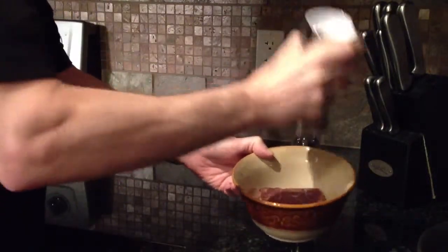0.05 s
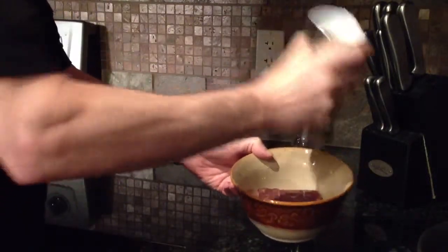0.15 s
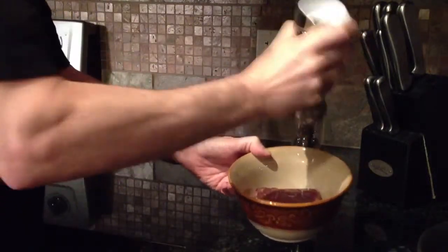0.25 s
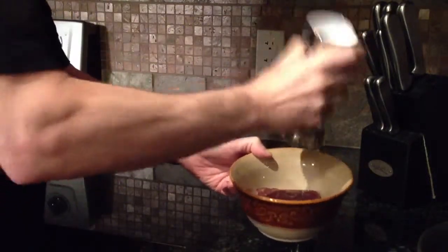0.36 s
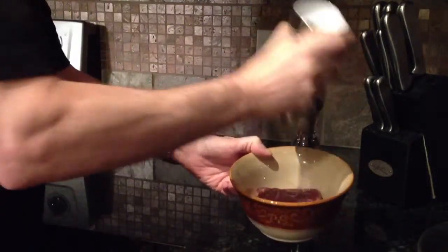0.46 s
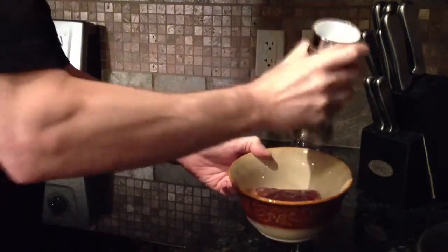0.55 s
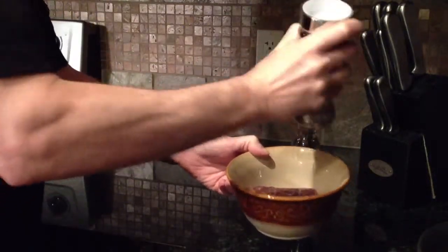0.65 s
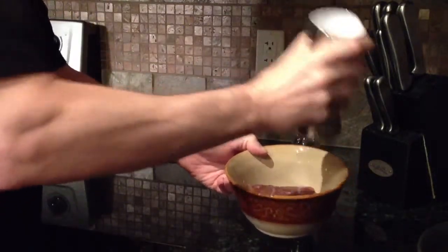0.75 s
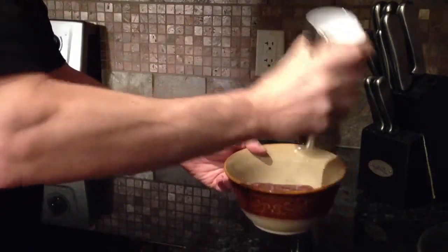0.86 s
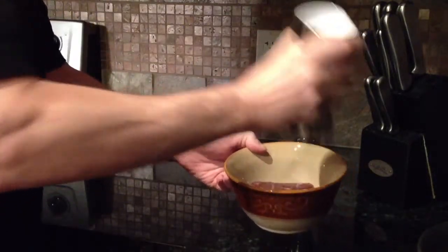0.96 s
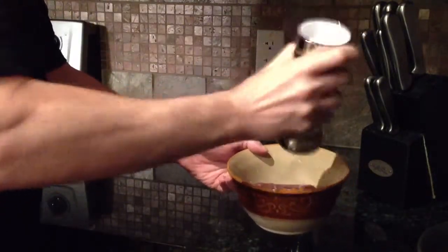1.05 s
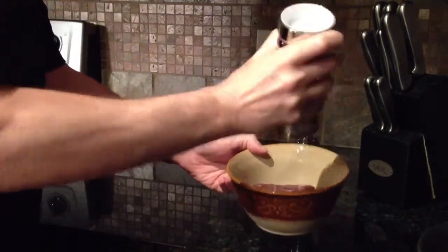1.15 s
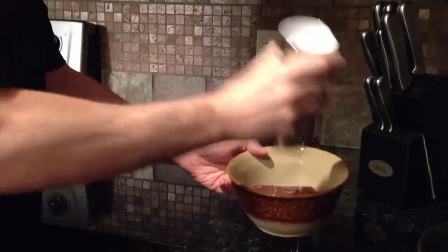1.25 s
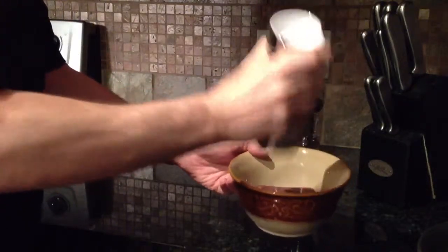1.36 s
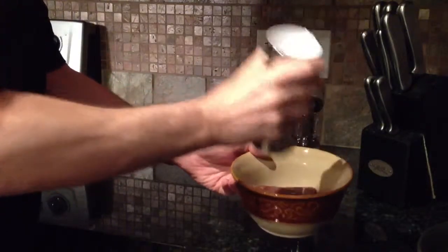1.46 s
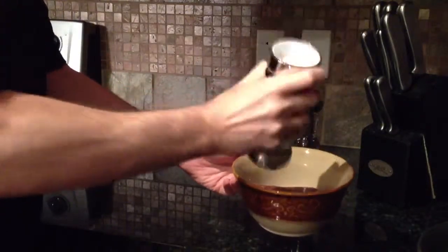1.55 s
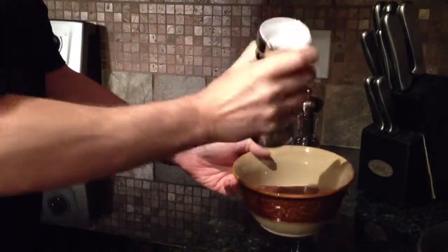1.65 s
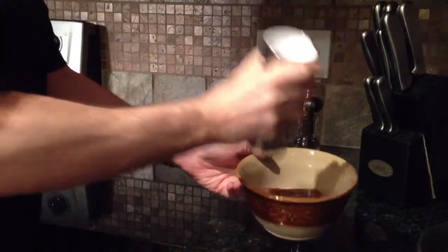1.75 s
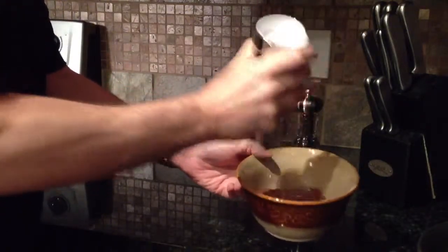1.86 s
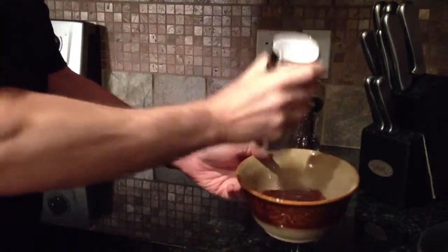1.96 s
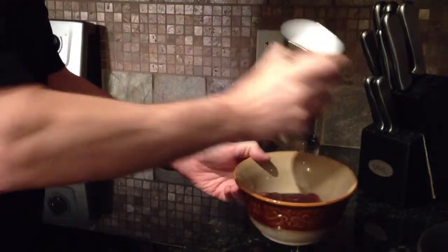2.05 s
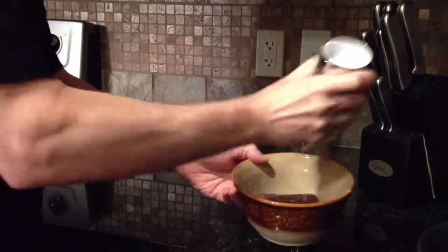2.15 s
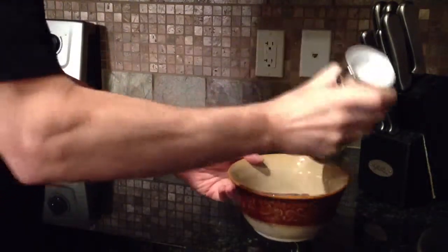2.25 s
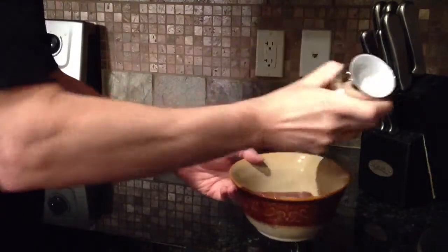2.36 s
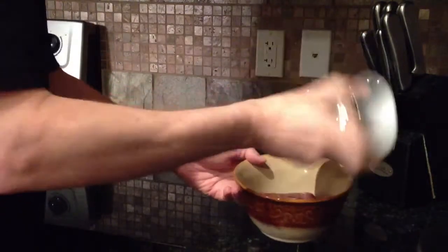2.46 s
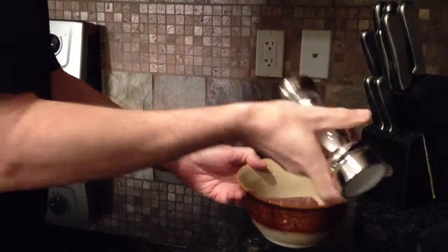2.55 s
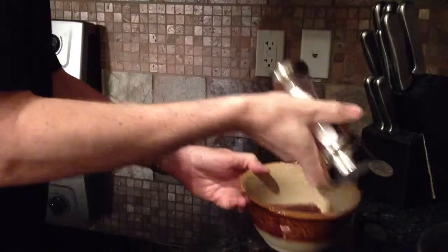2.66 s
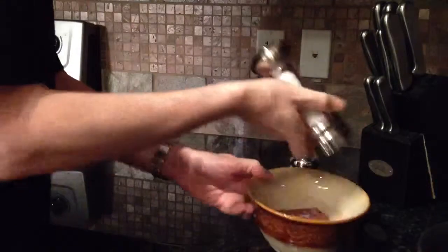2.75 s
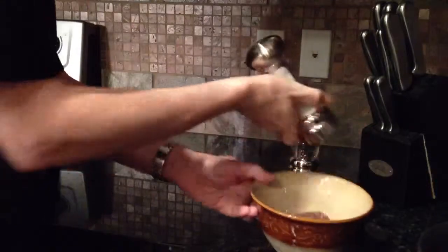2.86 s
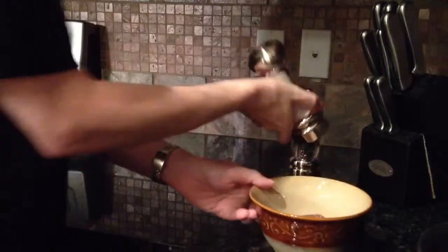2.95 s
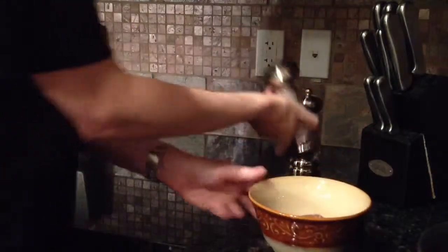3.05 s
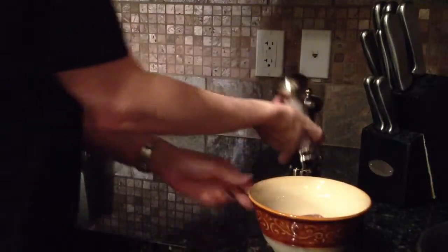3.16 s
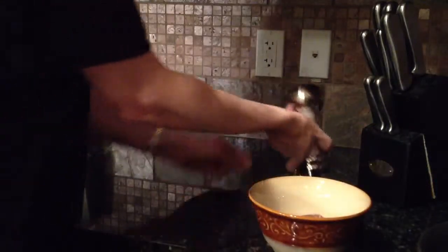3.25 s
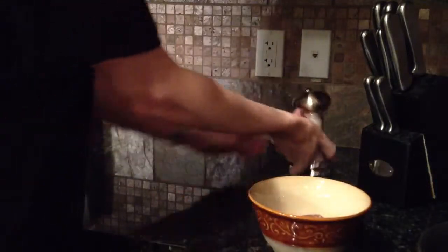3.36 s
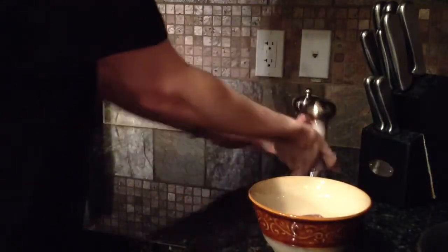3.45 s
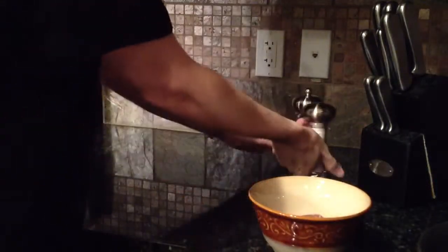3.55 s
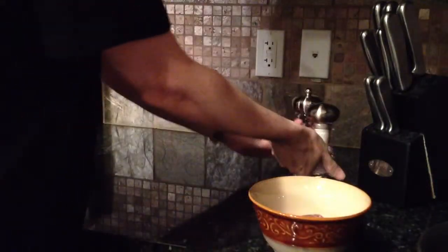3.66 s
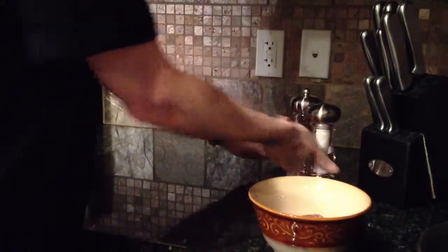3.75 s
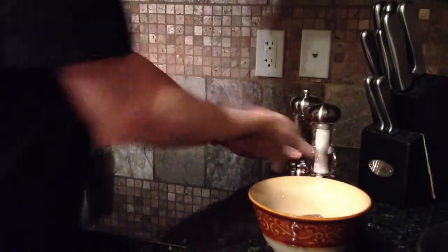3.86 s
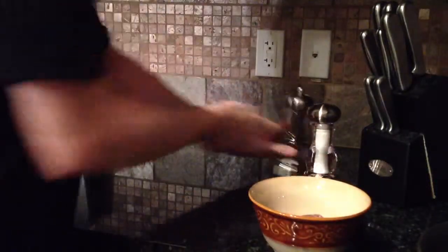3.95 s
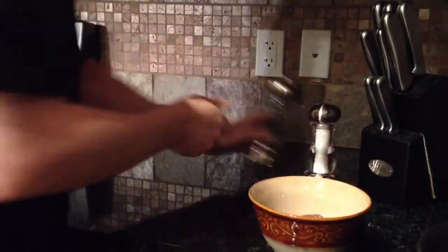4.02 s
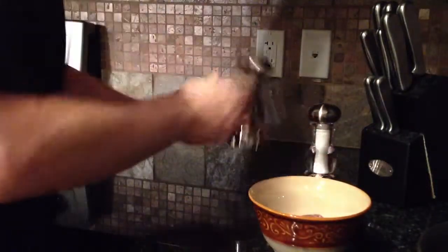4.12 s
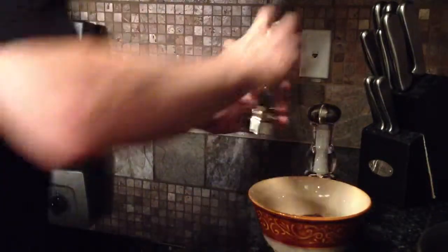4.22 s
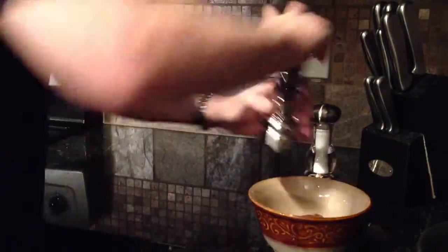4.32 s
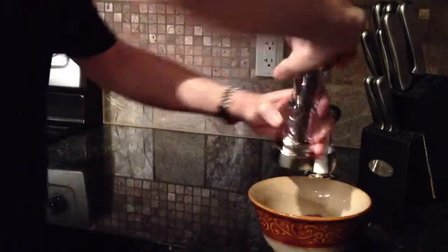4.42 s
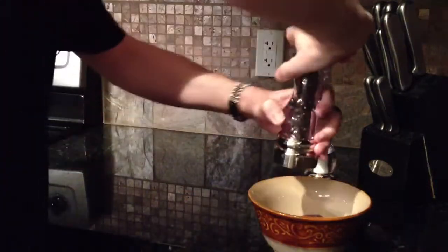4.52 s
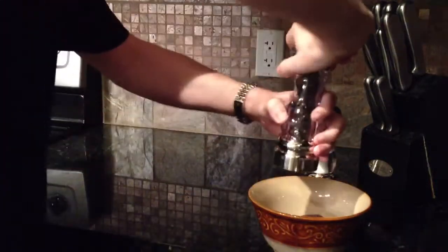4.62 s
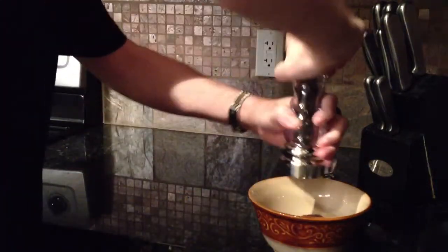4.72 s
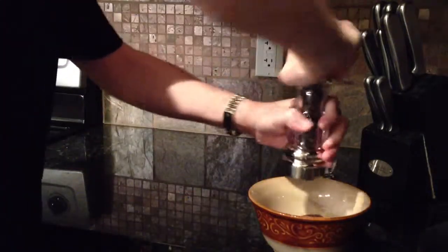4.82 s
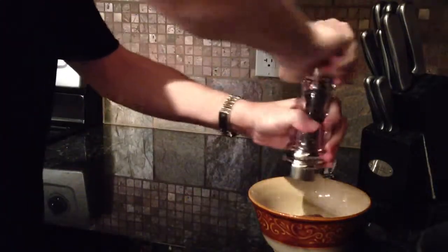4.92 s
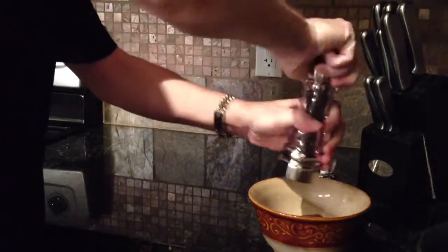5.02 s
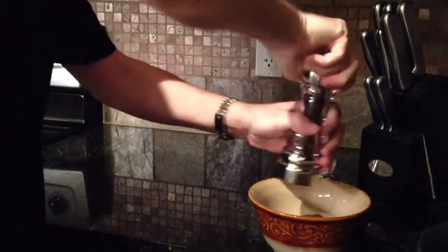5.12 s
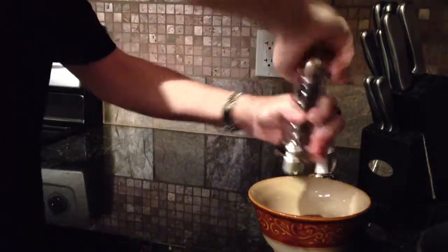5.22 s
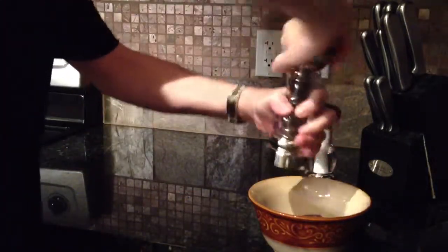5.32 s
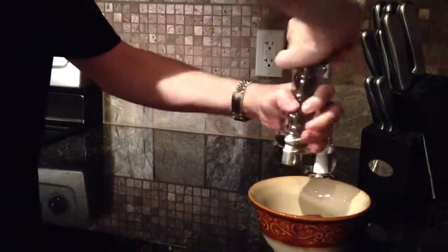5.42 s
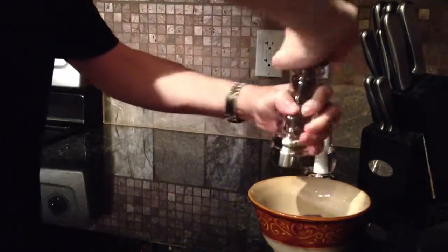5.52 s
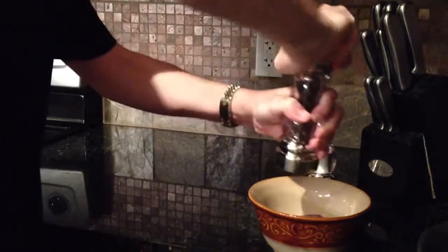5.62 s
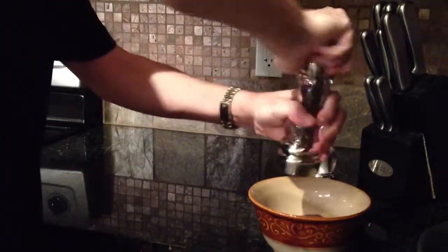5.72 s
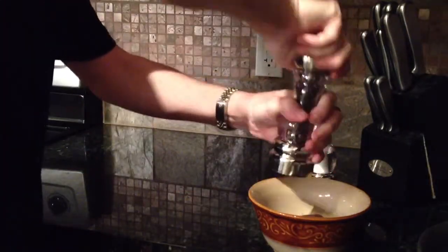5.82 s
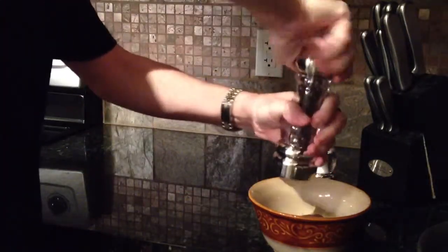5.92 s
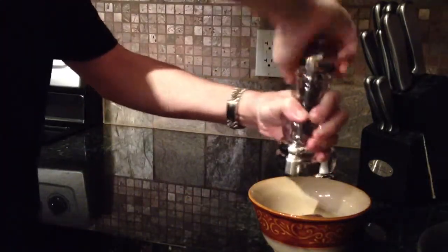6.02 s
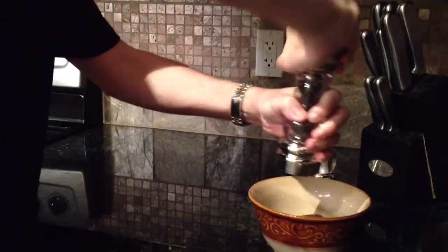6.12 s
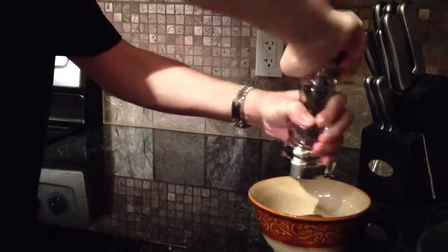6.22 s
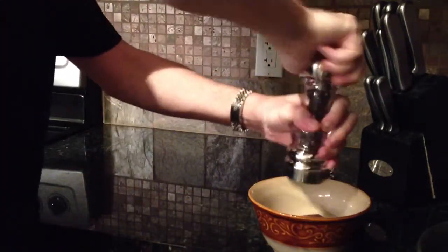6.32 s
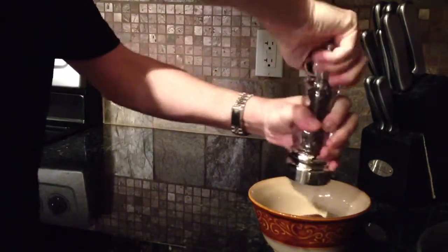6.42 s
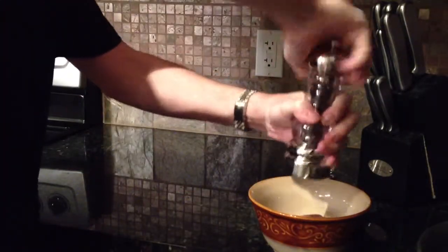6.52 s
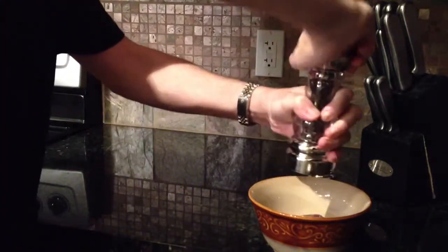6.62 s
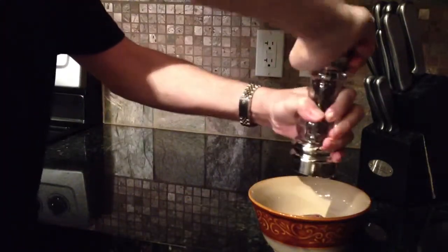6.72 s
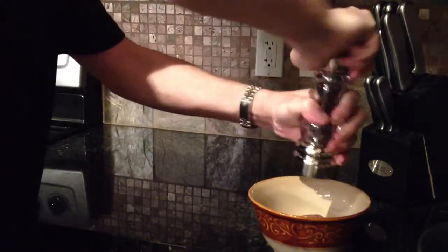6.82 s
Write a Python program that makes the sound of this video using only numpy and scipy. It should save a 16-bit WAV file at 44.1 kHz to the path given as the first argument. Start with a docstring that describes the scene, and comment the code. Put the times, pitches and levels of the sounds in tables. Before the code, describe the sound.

Salt shaken in soft quick strokes, a ceramic bowl knocks down on stone, a mill thuds, then pepper crunches in short twisting bouts in a kitchen.

```python
"""A pepper mill twisted in four bouts on a tiled kitchen counter, a small microphone about a metre away: corns crunch
between the burrs as dense grains that excite the mill's modes, and some crack as noisy bursts.
Before it, salt is shaken from a mill in short soft strokes of filtered crystal clicks, a ceramic bowl is set on
the stone and rocks, and the mill is put down hard: each contact is a push plus chatter, ringing the object.
Appliances murmur behind as coloured noise, with a drone and a faint whistle; hard walls echo the nearby work."""
import sys
import numpy as np
from scipy import signal
from scipy.fft import rfft, irfft
from scipy.io import wavfile
from scipy.ndimage import uniform_filter1d

SR = 44100
rng = np.random.default_rng(int(sys.argv[2]) if len(sys.argv) > 2 else 0)


def volts(x):
    """Linear amplitude factor 10**(x/20) for a level x in dB, scalar or array-like."""
    e = np.asarray(x, float) / 20
    return 10 ** e


def store_wav(level_fs):
    """Save 16-bit WAV to argv[1]."""
    pcm = np.round(np.clip(np.atleast_2d(level_fs), -1, 1) * 32767)
    wavfile.write(sys.argv[1], SR, pcm.T.astype(np.int16))


N = 303408
TIME = np.arange(N) / SR

# pushes of the wrist: (time [s], length [s], relative crunch level at start [dB], at end [dB])
TWISTS = [(4.72, 0.14, -72, -46.5), (4.94, 0.17, -45.5, -63), (5.61, 0.085, -63.5, -45),
          (5.745, 0.02, -45, -44.5), (6.208, .024, -64, -64), (6.238, 0.088, -49, -42),
          (6.733, 0.083, -56, -48.5), (6.85, 0.046, -36.5, -47)]
# corns bursting: (time [s], relative level [dB], brightness [dB])
CRACKS = [(4.778, -54, -6), (4.8435, -46, -12), (4.8747, -48.5, 15.5), (4.9205, -30, 7.5),
          (4.9246, -33.5, 8), (5.0068, -43.5, 10), (5.565, -25.5, 2), (5.6743, -45.5, -12),
          (5.7574, -49.5, 2), (5.775, -48.5, 4), (6.2329, -33, -16.5), (6.324, -39, -16), (6.343, -48, 7),
          (6.735, -37.5, -13), (6.843, -32.5, -15), (6.8698, -40.5, -21)]
# broad colour of crunch and cracks: (frequency [Hz], relative level [dB])
CRUNCH = [(400, -23), (694, -8.5), (1690, 0.5), (2630, 6.5), (3110, 1), (4800, -0.5), (5350, -6.5),
          (6800, -3), (7670, -7.5), (9790, -18), (12500, -15.5), (15500, -34.5)]
# modes of the pepper mill: (frequency [Hz], relative level [dB], t60 [s])
PEPPER_MILL = [(1468, 3, 0.04), (1724, 6, 0.045), (1965, 6, 0.04), (2220, 9, 0.045), (2470, 6, .045),
               (2680, 7, 0.04), (4740, 0, 0.026)]
CRUNCH_PER_S, CRUNCH_SPREAD_DB, CRUNCH_SMEAR_S = 2400, 2.9, 0.0012
CRACK_MS, SLOWER_WHEN_DULL = 3.86, 0.39  # length at brightness 0 dB; dB longer per dB duller
DEBRIS_DB, DEBRIS_S = -33, 0.0091  # fragments ground right after a burst: relative level, decay
POP_HZ, POP_DB, POP_MS = 2437, -13.5, 2  # hollow pop of a corn that yields slowly
GRIP_SHIFT_DB, GRIP_SHIFT_S = 6, 0.05  # the moving hand frees and damps each mode of the mill

# salt strokes: (time of the front's peak [s], relative level [dB], lag of the rear of the pile [ms])
SHAKE = [(0.017, -54, 16), (0.173, -55, 41), (0.35, -53.5, 48), (0.527, -55, 58), (0.72, -61, 44),
         (0.882, -57.5, 26), (1.04, -55, 44), (1.22, -56.5, 30), (1.39, -55.5, 36), (1.565, -59, 21),
         (1.74, -57.5, 19), (1.89, -56, 46), (2.268, -61.5, 21), (2.531, -60.5, 59)]
# colour of the crystal hiss: (frequency [Hz], relative level [dB])
SALT = [(1890, -15.5), (2180, -1), (2450, -12), (6120, -11.5), (7140, -8.5), (10200, -15.5), (15000, -15)]
# wall modes of the salt mill: (frequency [Hz], relative level [dB], t60 [s])
SALT_MILL = [(2175, -4.5, 0.0075), (5430, -10, 0.0251), (7540, 4.5, 0.0067)]
# lumps of salt rattling on the cap: (time [s], relative level [dB])
LUMPS = [(.175, -35), (1.89, -43), (2.27, -43), (2.54, -43.5)]
LUMP_S = 0.02  # half width of each rattle
SLUMP_RISE_MS, REAR_DB = 30, -1.5  # swell of each slump; rear of the pile against the front
FRONT_FAVOURS, REAR_FAVOURS = [-6, 1.9, -4.5], [1.5, -6.5, 1.8]  # relative level per wall mode [dB]

# bowl touching the counter: (time [s], relative level [dB], contact [ms], chatter [dB])
BOWL_HITS = [(2.73, 1, 0.35, 17.5), (2.7334, -1.5, 0.23, -8.5), (2.7359, 1, 0.33, -4),
             (2.8204, -6, 0.18, 1), (2.8244, -2.5, 0.29, 4), (2.926, -22, 0.5, -2.5),
             (3.031, -14.5, 0.76, 6), (3.0371, -19.5, .45, 3)]
# broad colour of the bowl's thud: (frequency [Hz], relative level [dB])
BOWL_THUD = [(47, -47), (80, -24.5), (200, -32), (610, -11), (880, -6.5), (1390, -7.5), (1580, -14),
             (2480, -15), (2890, -26), (4650, -34), (5410, -41), (8160, -38), (14000, -66.5)]
# modes of the bowl: (frequency [Hz], relative level [dB], t60 [s])
BOWL = [(266, -5, 0.12), (433.4, -2.5, 0.13), (764, -8, 0.087), (1048, -3, 0.1), (1346, -2.5, 0.082),
        (1774, -5, 0.13), (7880, -13, 0.036), (11300, -15, 0.045)]
# the rim sings after a contact, for longer the less the hand and counter hold it:
# (time [s], relative level [dB], t60 [s])
RIM_RINGS = [(2.732, 15, 0.16), (2.8203, 6.5, 0.12), (3.038, -16.5, 0.38)]
RIM_HZ = 2466
# air pocket under the foot of the bowl: its note climbs as the foot rebounds
POCKET_LOW_HZ, POCKET_HIGH_HZ, POCKET_CLIMB_S, POCKET_T60_S = 1026.6, 1181, 0.017, 0.13
POCKET_SAG_HZ_PER_MS = 430  # the start is this much lower per ms of contact

# mill touching the counter: (time [s], relative level [dB], contact [ms], chatter [dB])
MILL_HITS = [(3.4945, -19.5, 0.5, 19.5), (3.4975, -8, 0.614, 12), (3.5095, -7.5, 0.76, 2.5)]
# broad colour of the mill's thud: (frequency [Hz], relative level [dB])
MILL_THUD = [(47, -53), (150, -11), (471, -3.5), (833, -12), (1320, -9), (2440, -14.5), (4400, -12),
             (6110, -18.5), (9890, -35.5), (15000, -42.5)]
# modes of the mill set down: (frequency [Hz], relative level [dB], t60 [s])
MILL = [(226, 1, 0.4), (295, 2, .3), (427, 8, 0.3), (511, 13, 0.12), (603, 3, 0.2), (1230, 2, 0.1)]
BOWL_CHATTER, MILL_CHATTER = 8.73, 4  # chatter time as a multiple of the contact
BOWL_SOFT, MILL_SOFT = 0.2, 0.015  # the chatter is blunted by this share of the contact time
TICK_DB = -22.5  # the hard edge of each contact

# hands sliding on the mills, corns shifting inside:
# (time [s], length [s], relative level at start [dB], at end [dB])
HANDLE = [(3.413, 0.0032, -75, -78.5), (3.96, 0.11, -78.5, -65.5), (4.11, 0.156, -77.5, -74.5),
          (4.322, 0.17, -64, -70)]
# colour of that rustle: (frequency [Hz], relative level [dB])
RUSTLE = [(1060, -29), (1800, -6), (5990, -1.5), (6690, 5.5), (7680, 3), (8960, -13), (14000, -14.5)]
GRIP_DB_PER_S, LET_GO_DB_PER_S = 902, 464  # how fast an effort starts and dies

# decay of the tiled room: (frequency [Hz], t60 [s])
ROOM = [(150, 0.83), (400, 0.67), (1000, 0.67), (2500, 0.45), (6000, 0.68), (12000, 0.39)]

# colour of the appliance hiss: (frequency [Hz], relative level [dB])
KITCHEN = [(60, -38.5), (112, -5.5), (291, -9), (433, -9.5), (889, -19.5), (1050, -13.5), (1450, -21),
           (3420, -22.5), (13500, -29.5), (15500, -26.5)]
# blurred tones of the appliances: (frequency [Hz], relative level [dB], t60 [s])
MURMUR = [(109.4, -1.5, 0.99), (246, -7, 0.31), (352.3, -8, 0.21), (436, -5.5, 0.25), (606, -8.5, 0.082),
          (1015.5, -10.5, 0.017)]
KITCHEN_DB = -65.5  # rms of hiss and murmur together
# a low drone that swells and fades: (time of peak [s], half width [s], relative level [dB])
DRONE = [(1.25, 0.37, -70)]
DRONE_HZ, DRONE_REST_DB = 166, -70.5
# a faint whistle that comes and goes: (time [s], length [s], pitch [Hz], relative level [dB])
WHISTLE = [(3.333, 0.079, 1254, -74), (4.394, 0.34, 1230, -76), (5.116, 0.38, 1311, -78)]
WHISTLE_WOBBLE_HZ, WHISTLE_FLUTTER_DB = 25.2, 3  # per unit of waver and flutter

# treble response of the microphone: (frequency [Hz], gain [dB])
MICROPHONE = [(8200, 1.5), (10000, -4), (12000, 2)]
BASS_CUT_HZ = 116.5


def level(x, db):
    """Scale to an rms level."""
    return x * volts(db) / np.sqrt(np.mean(x ** 2))


def colour(x, points, size=4096):
    """Causal minimum-phase filter whose gain follows (Hz, dB) points."""
    hz, db = np.transpose(points)
    grid = np.arange(size // 2 + 1) * SR / size + 1
    log_gain = np.interp(np.log(grid), np.log(hz), db, left=db[0]) * np.log(10) / 20
    cepstrum = irfft(log_gain)
    # fold the cepstrum so that nothing sounds before its cause
    cepstrum[1:size // 2] *= 2
    cepstrum[size // 2 + 1:] = 0
    impulse = irfft(np.exp(rfft(cepstrum)))
    return signal.fftconvolve(x, impulse)[:len(x)]


def ring(x, modes):
    """The object's exponentially decaying modes, excited by x."""
    t = TIME[:SR // 2]
    impulse = sum(volts(db) * np.sin(2 * np.pi * hz * t) * 1000. ** (-t / t60) for hz, db, t60 in modes)
    return signal.fftconvolve(x, impulse)[:N]


def gate(rows):
    """Gain of efforts that set in quickly, run from a start to an end level and die away."""
    s, length, start_db, end_db = np.transpose(rows)[:, :, None]
    hold = start_db + (end_db - start_db) * np.clip((TIME - s) / length, 0, 1)
    onset = GRIP_DB_PER_S * np.clip(s - TIME, 0, None)
    release = LET_GO_DB_PER_S * np.clip(TIME - s - length, 0, None)
    return volts(hold - onset - release).sum(axis=0)


def grains(rate, spread_db, smear_s):
    """Random clicks, a few larger than the rest, each with a short gritty tail; rms 1."""
    when = rng.random(N) < rate / SR
    sizes = when * volts(spread_db * rng.exponential(size=N))
    tails = signal.lfilter([1], [1, -np.exp(-1 / (smear_s * SR))], sizes)
    return level(tails * rng.standard_normal(N), 0)


def body(force, shape, modes, ring_db, rings=ring):
    """Broad colour of the object plus its ringing modes; rms 1."""
    broad = level(colour(force, shape), 0)
    ringing = level(rings(force, modes), ring_db)
    return level(broad + ringing, 0)


def shifting(force, modes):
    """Modes whose strengths wander apart from one another as the grip moves."""
    k = int(GRIP_SHIFT_S * SR)
    steps = np.repeat(rng.standard_normal((len(modes), N // k + 1)), k, axis=1)
    wander = uniform_filter1d(steps, k, axis=1)[:, :N]
    return sum(ring(force * volts(GRIP_SHIFT_DB * w), [mode]) for w, mode in zip(wander, modes))


def pepper(ring_db):
    """Fragments crush densely while the burr turns; whole corns burst with a snap and a spray of splinters."""
    ms = TIME[:SR // 5] * 1000
    bursts, debris, pops = np.zeros((3, N + len(ms)))
    for s, db, bright_db in CRACKS:
        span = slice(int(s * SR), int(s * SR) + len(ms))
        length_ms = CRACK_MS * volts(-SLOWER_WHEN_DULL * bright_db)
        fade = 2 * np.exp(-2 * ms / length_ms) + 0.56 * np.exp(-ms / 9)
        spray = rng.standard_normal(len(ms)) * fade
        # a corn that yields slowly is dull, one that snaps adds sharp edges
        dull = uniform_filter1d(spray, size=5) - uniform_filter1d(spray, size=31)
        sharp = np.diff(spray, prepend=0)
        bursts[span] += volts(db) * (dull + volts(bright_db) * sharp)
        pop = np.exp(-(ms / POP_MS - 1) ** 4) * np.sin(2 * np.pi * POP_HZ * ms / 1000)
        pops[span] += volts(db - bright_db / 2) * pop
        debris[span] += volts(db + DEBRIS_DB) * np.exp(-ms / 1000 / DEBRIS_S)
    crunch = (gate(TWISTS) + debris[:N]) * grains(CRUNCH_PER_S, CRUNCH_SPREAD_DB, CRUNCH_SMEAR_S)
    force = volts(-9.5) * crunch + volts(-12.5) * bursts[:N]
    return force.std() * body(force, CRUNCH, PEPPER_MILL, ring_db, shifting) + volts(POP_DB) * pops[:N]


def salt():
    """Each stroke throws the front of the pile against the cap, then the rear; they favour other wall modes."""
    s, db, lag_ms = np.transpose(SHAKE)[:, :, None]
    s, db = np.vstack([s, s + lag_ms / 1000]), np.vstack([db, db + REAR_DB])
    u = np.clip(1 + (TIME[:3 * SR] - s) * 1000 / SLUMP_RISE_MS, 0, None)
    slumps = volts(db) * (u * np.exp(1 - u)) ** 3.58
    slumps = np.pad(slumps, ((0, 0), (0, N - 3 * SR)))
    crystals = grains(2500, 3.2, 0.00045)
    hiss = level(colour(crystals, SALT), -11) * slumps.sum(axis=0)

    favour_db = np.repeat([FRONT_FAVOURS, REAR_FAVOURS], len(SHAKE), axis=0)
    uneven_db = 4.5 * rng.standard_normal((len(s), len(SALT_MILL)))
    favour = volts(favour_db + uneven_db)
    wall = sum(ring(crystals * (favour[:, k] @ slumps), [mode]) for k, mode in enumerate(SALT_MILL))

    lumps = sum(volts(lump_db) * np.exp(-((TIME - at) / LUMP_S) ** 2) for at, lump_db in LUMPS)
    rattle = ring(crystals * lumps, SALT_MILL[1:2])
    return hiss + volts(-40) * rattle + volts(-38) * wall


def knocks(hits, chatter, soft, shape, modes, ring_db, rms_db):
    """Each contact is a smooth push with a hard edge, and a short chatter of the rim settling."""
    force, ms = np.zeros(N), TIME[:SR // 10] * 1000
    for s, db, contact_ms, chatter_db in hits:
        push = np.exp(-.5 * (ms / contact_ms * 4 - 2) ** 2) / contact_ms
        tick = volts(TICK_DB) * (ms == 0)
        settle = ms / (chatter * contact_ms) * np.exp(-ms / (chatter * contact_ms))
        keep = np.exp(-1000 / (soft * contact_ms * SR))
        grit = signal.lfilter([1 - keep], [1, -keep], rng.standard_normal(len(ms)))
        force[int(s * SR):][:len(ms)] += volts(db) * (push + tick + volts(chatter_db) * settle * grit)
    return volts(rms_db) * body(force, shape, modes, ring_db)


def pocket(db):
    """A short note of trapped air that glides up after each contact; a slower contact starts it lower."""
    t, out = TIME[:SR // 4], np.zeros(N)
    for s, hit_db, contact_ms, _ in BOWL_HITS:
        low_hz = POCKET_LOW_HZ - POCKET_SAG_HZ_PER_MS * contact_ms
        hz = POCKET_HIGH_HZ - (POCKET_HIGH_HZ - low_hz) * np.exp(-t / POCKET_CLIMB_S)
        note = np.sin(2 * np.pi * np.cumsum(hz) / SR) * 1000. ** (-t / POCKET_T60_S)
        out[int(s * SR):][:len(t)] += volts(hit_db + db) * note
    return out


def rim(db):
    """A thin decaying note of the rim, slightly unsteady in level while the bowl rocks."""
    t, out = TIME[:SR // 2], np.zeros(N)
    for (s, ring_db, t60), phase in zip(RIM_RINGS, rng.random(len(RIM_RINGS))):
        note = np.sin(2 * np.pi * (RIM_HZ * t + phase)) * 1000. ** (-t / t60)
        out[int(s * SR):][:len(t)] += volts(ring_db + db) * note
    unsteady = level(uniform_filter1d(rng.standard_normal(N), size=500), 0)
    return out * volts(3 * unsteady)


def bowl(rms_db, ring_db):
    """Ceramic on stone: the contacts ring the bowl, the air under its foot and its rim."""
    thuds = knocks(BOWL_HITS, BOWL_CHATTER, BOWL_SOFT, BOWL_THUD, BOWL, ring_db, rms_db)
    return thuds + pocket(rms_db + 20) + rim(rms_db)


def mill_put_down(rms_db, ring_db):
    """The mill's hard contacts with the counter, ringing its low modes."""
    return knocks(MILL_HITS, MILL_CHATTER, MILL_SOFT, MILL_THUD, MILL, ring_db, rms_db)


def hands():
    """A fine dry rustle of dense small clicks."""
    return gate(HANDLE) * level(colour(grains(3000, 2.0, 0.00051), RUSTLE), 1.6)


def handled(bowl_db, mill_db, held_db, ring_db):
    """Bowl, mills and hands heard from one side; chatter, splinters and ringing differ from side to side."""
    set_down = bowl(bowl_db, ring_db - 2.5) + mill_put_down(mill_db, ring_db - 1.5)
    return set_down + volts(held_db) * (pepper(ring_db) + salt() + hands())


def walls(x, onset_s=0.0014, near_db=9, near_share=0.27):
    """Dense echoes, each band dying at its own rate: strong quick ones from the tiled corner, then the room."""
    t, tail = TIME[:SR], 0
    hz = np.log(np.arange(SR // 2 + 1) + 1.)
    spectrum = rfft(rng.standard_normal(SR))
    for k, (_, t60) in enumerate(ROOM):
        share = np.interp(hz, np.log(np.array(ROOM)[:, 0]), np.arange(len(ROOM)) == k)
        near = volts(near_db) * 1000. ** (-t / (near_share * t60))
        far = 1000. ** (-t / t60)
        tail = tail + irfft(spectrum * share, SR) * (far + near)
    tail = tail * (1 - np.exp(-(t / onset_s) ** 2))
    # many overlapping room modes: no pitch region stands out
    modes = rfft(tail)
    even = modes / np.sqrt(uniform_filter1d(np.abs(modes) ** 2, size=14))
    return signal.fftconvolve(x, irfft(even, SR)[:SR * 3 // 4])[:N]


def murmur(waver):
    """Appliances: hiss plus noise ringing a few blurred tones whose level wavers."""
    air = rng.standard_normal(N)
    hiss = level(colour(air, KITCHEN), 0)
    tones = level(ring(air * volts(4.35 * waver), MURMUR), -1.2)
    return level(hiss + tones, KITCHEN_DB)


def drone():
    """Noise through one low resonance, swelling above a steady rest level."""
    swell = volts(DRONE_REST_DB) + sum(volts(db) * np.exp(-((TIME - s) / width) ** 2) for s, width, db in DRONE)
    return swell * level(ring(rng.standard_normal(N), [(DRONE_HZ, 0, 0.15)]), -5.0)


def whistle(waver):
    """A faint sine tone that fades in and out, with wobbling pitch and fluttering level."""
    flutter = level(uniform_filter1d(rng.standard_normal(N), size=300), 0)
    wobble_hz = WHISTLE_WOBBLE_HZ * (waver + 2 * flutter)
    out = np.zeros(N)
    for s, length, hz, db in WHISTLE:
        fade = np.exp(-(2 * (TIME - s) / length - 1) ** 4)
        tone = np.sin(2 * np.pi * np.cumsum(hz + wobble_hz) / SR)
        out += fade * level(tone, db)
    return volts(WHISTLE_FLUTTER_DB * flutter) * out


def kitchen():
    """The background: murmur and whistle share one slow random waver, the drone swells by itself."""
    waver = uniform_filter1d(np.repeat(rng.standard_normal(N // 4000 + 1), 4000), 4000)[:N]
    return murmur(waver) + drone() + whistle(waver)


def scene():
    """Handled objects arrive directly and by the walls from three other sides; the background lies beneath."""
    direct = handled(bowl_db=-42.0, mill_db=-46.5, held_db=-1.0, ring_db=-5.0)
    room = sum(walls(handled(bowl_db=-52.0, mill_db=-55.0, held_db=-9.0, ring_db=-11.0)) for _ in range(3))
    return (direct + room + kitchen())[None]


def low_pass(x):
    """Removes everything above the highest recorded frequency."""
    return signal.sosfilt(signal.butter(12, 15400, fs=SR, output="sos"), x)


def record(dry):
    """The small microphone loses the deep bass and dips in the high treble."""
    bass_cut = signal.butter(3, BASS_CUT_HZ, "high", fs=SR, output="sos")
    thin = signal.sosfilt(bass_cut, dry)
    mix = colour(thin[0], MICROPHONE)[None]
    return low_pass(mix)


dry = scene()
out = record(dry)
store_wav(out)
```